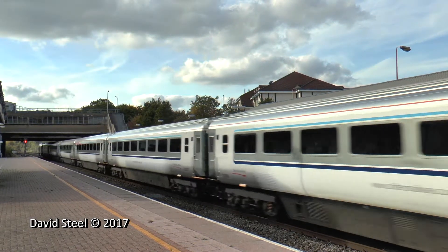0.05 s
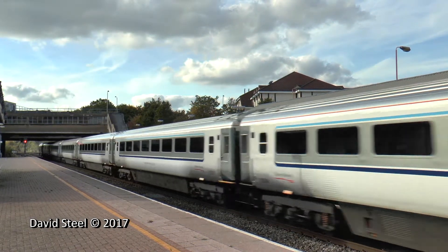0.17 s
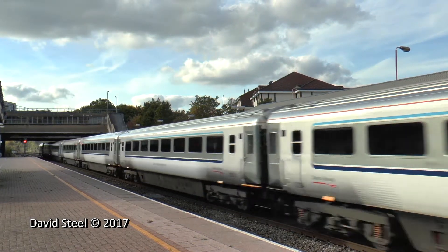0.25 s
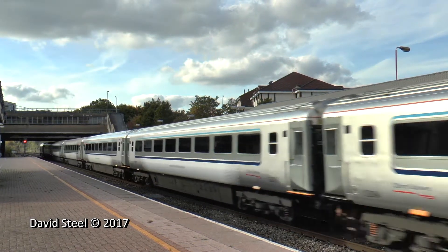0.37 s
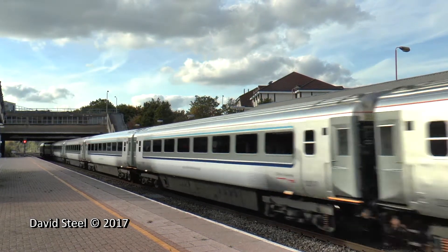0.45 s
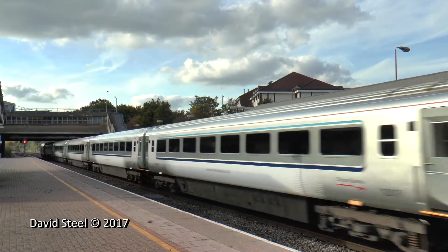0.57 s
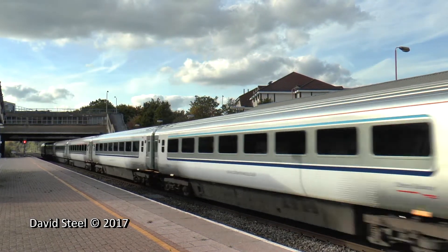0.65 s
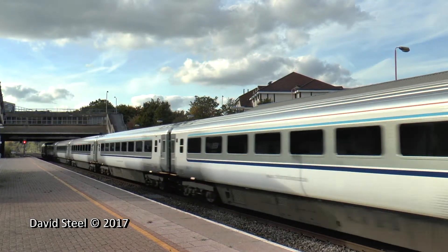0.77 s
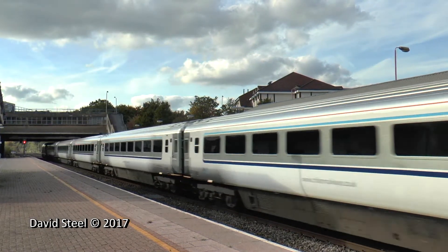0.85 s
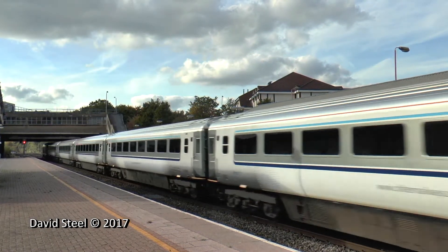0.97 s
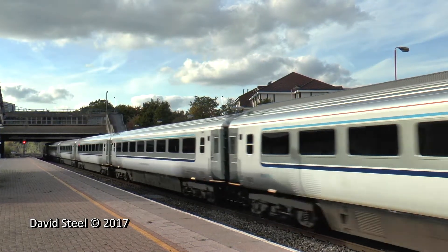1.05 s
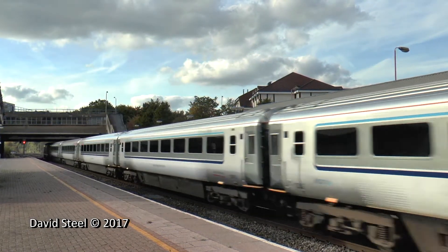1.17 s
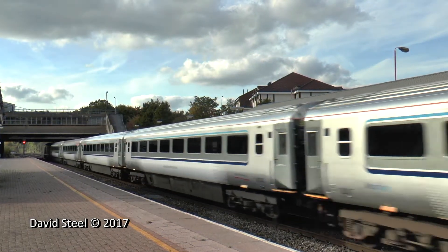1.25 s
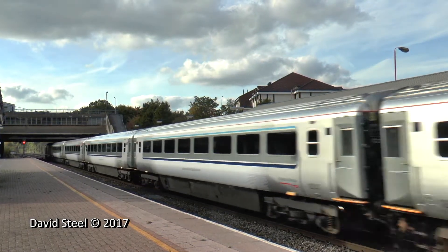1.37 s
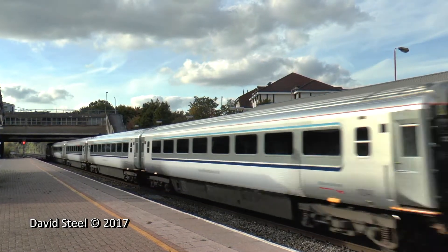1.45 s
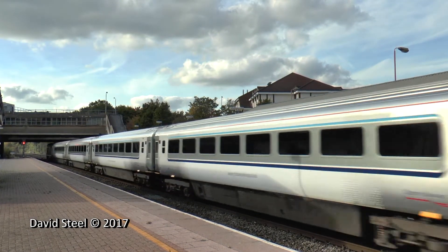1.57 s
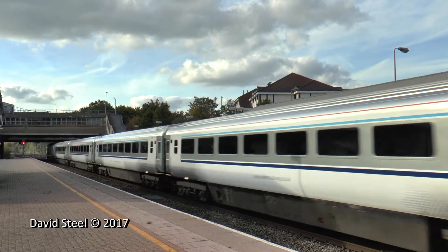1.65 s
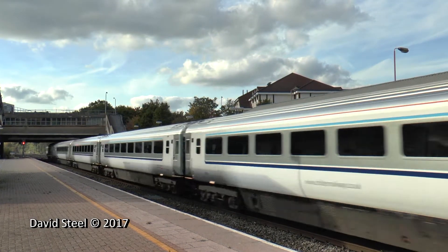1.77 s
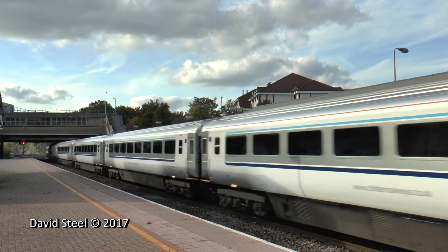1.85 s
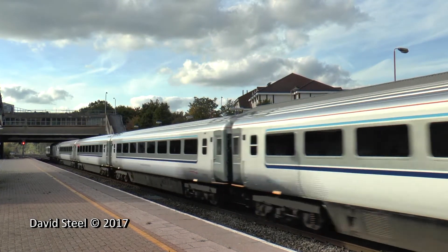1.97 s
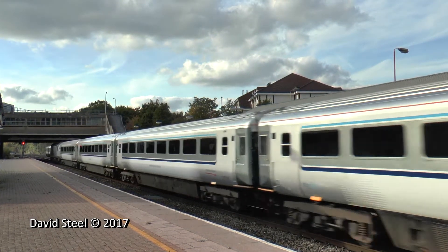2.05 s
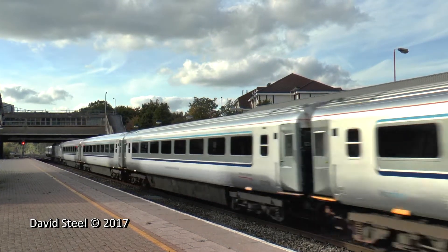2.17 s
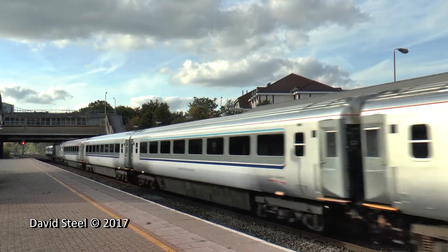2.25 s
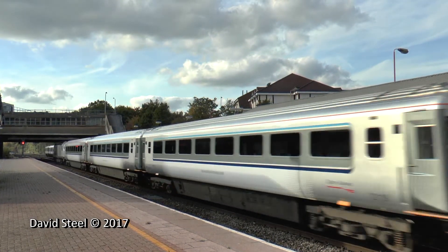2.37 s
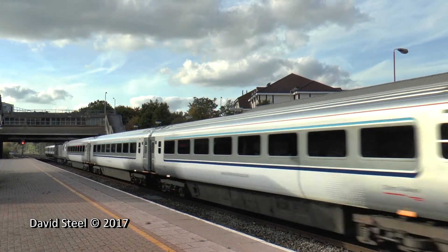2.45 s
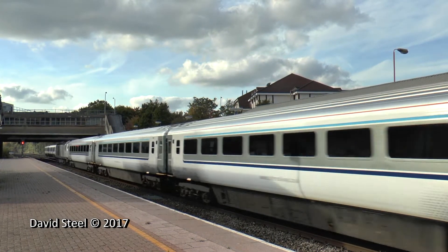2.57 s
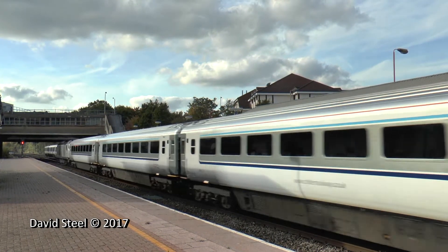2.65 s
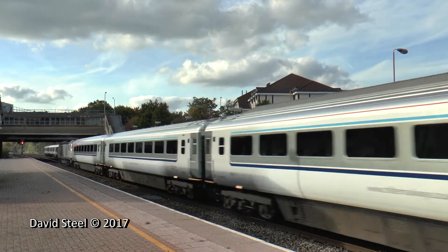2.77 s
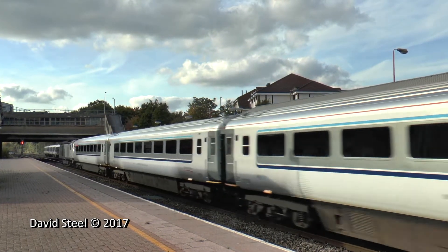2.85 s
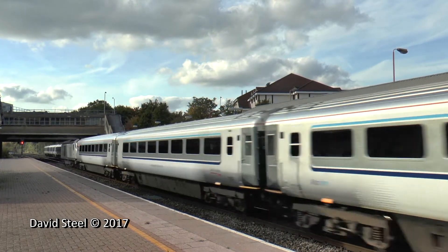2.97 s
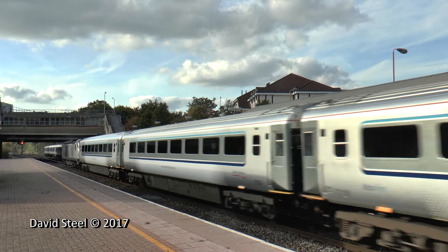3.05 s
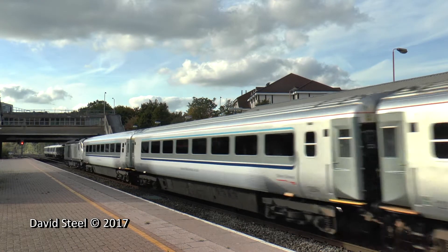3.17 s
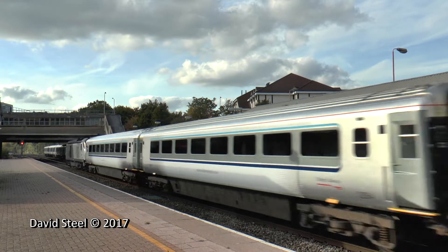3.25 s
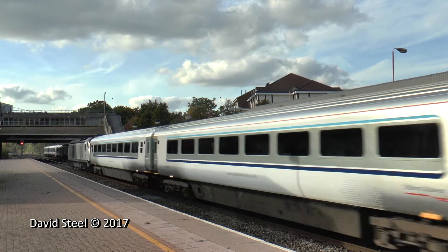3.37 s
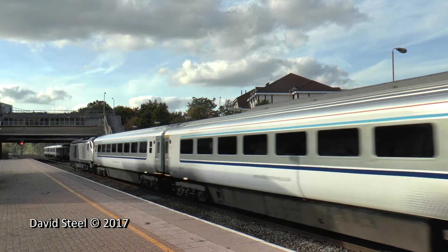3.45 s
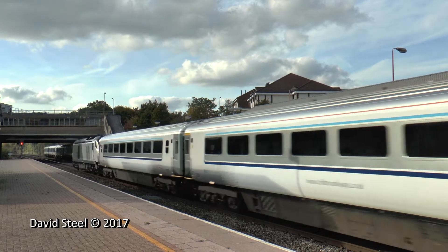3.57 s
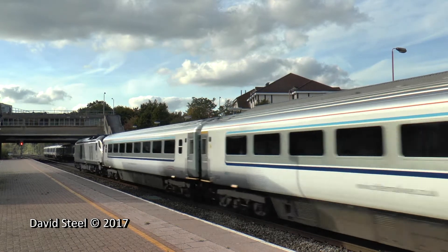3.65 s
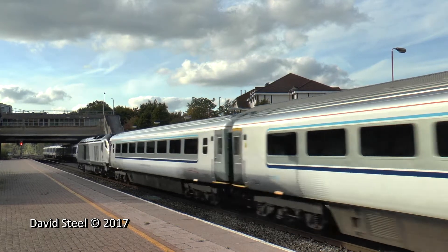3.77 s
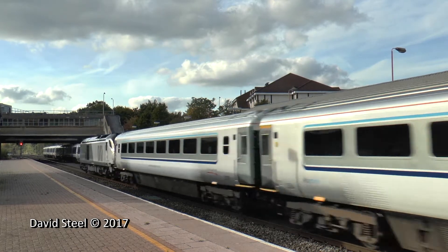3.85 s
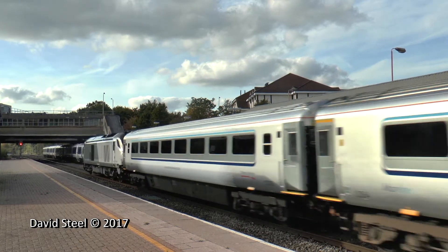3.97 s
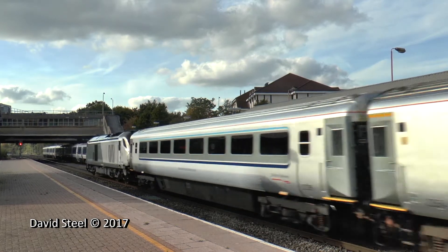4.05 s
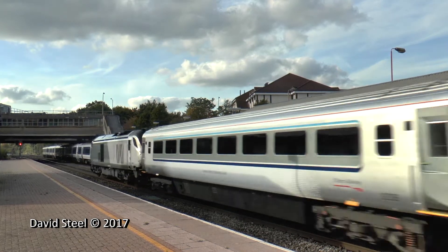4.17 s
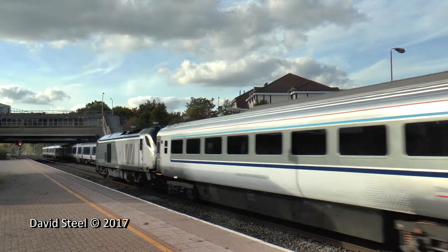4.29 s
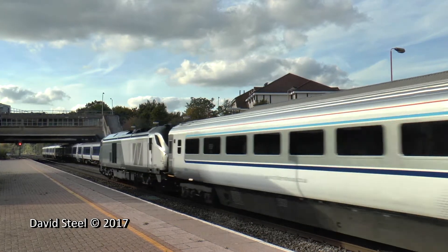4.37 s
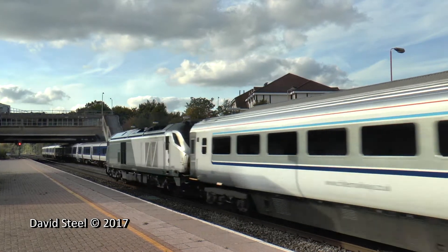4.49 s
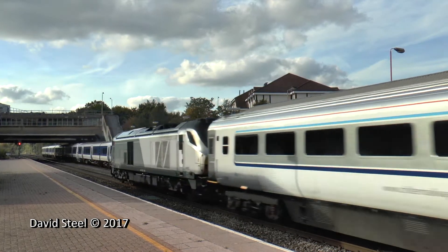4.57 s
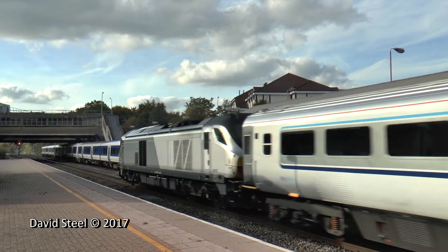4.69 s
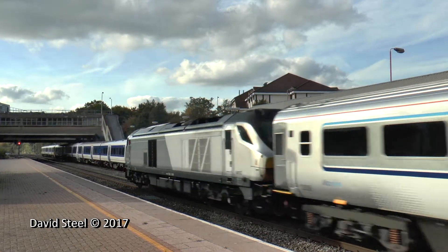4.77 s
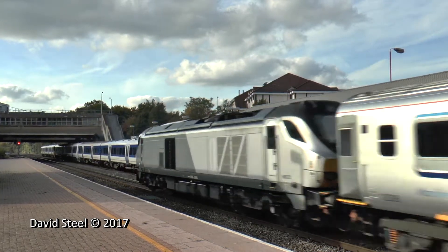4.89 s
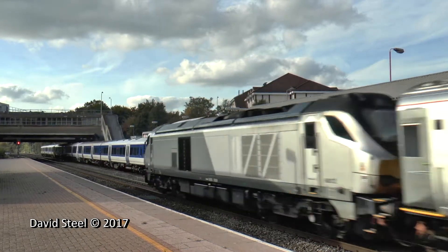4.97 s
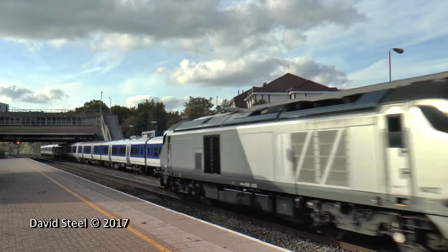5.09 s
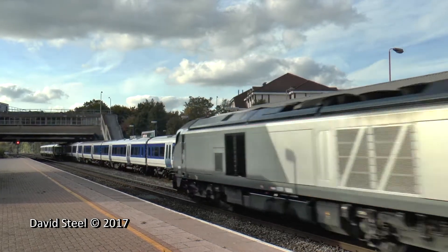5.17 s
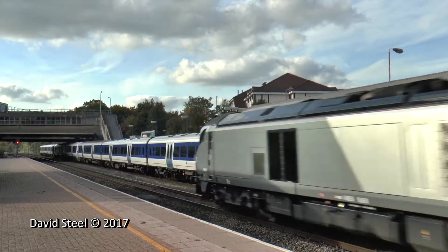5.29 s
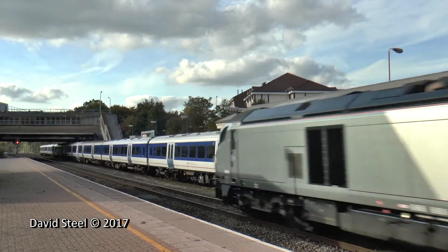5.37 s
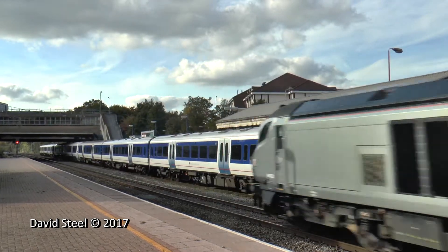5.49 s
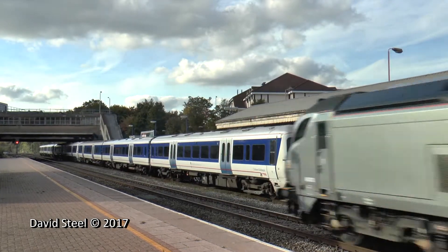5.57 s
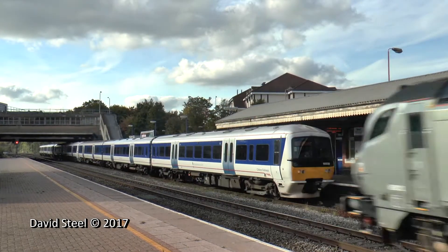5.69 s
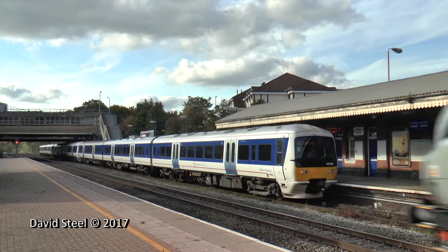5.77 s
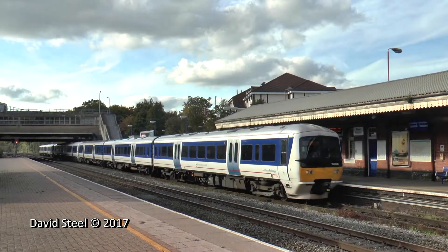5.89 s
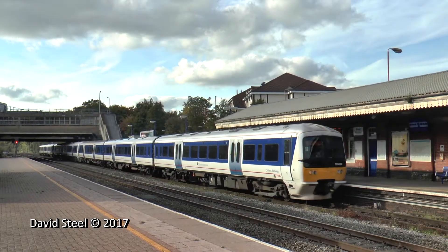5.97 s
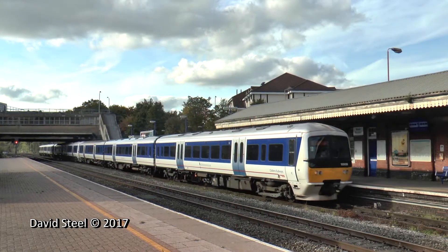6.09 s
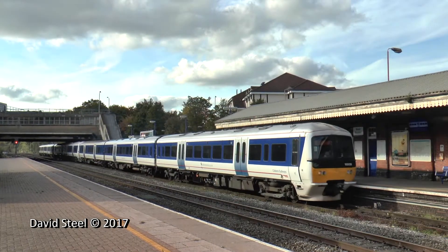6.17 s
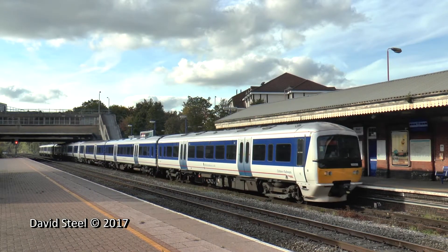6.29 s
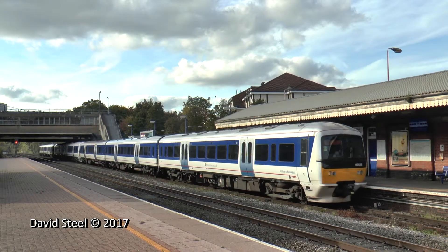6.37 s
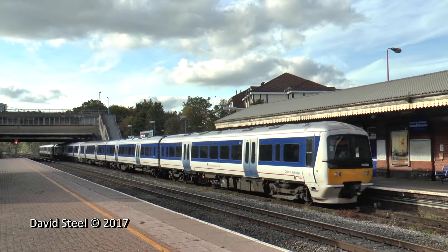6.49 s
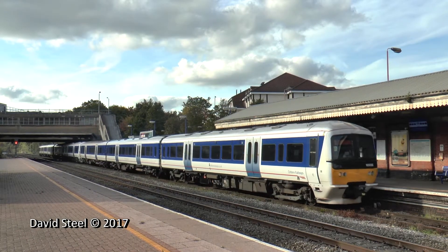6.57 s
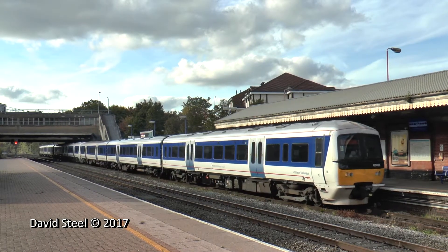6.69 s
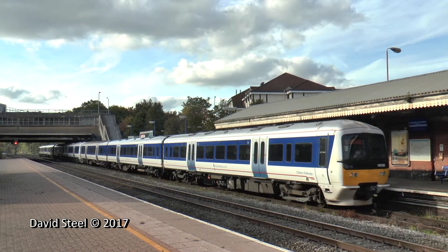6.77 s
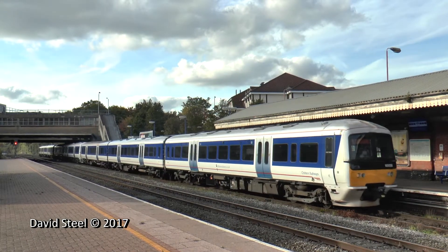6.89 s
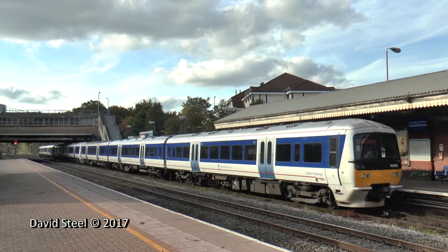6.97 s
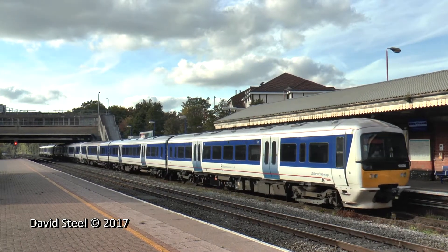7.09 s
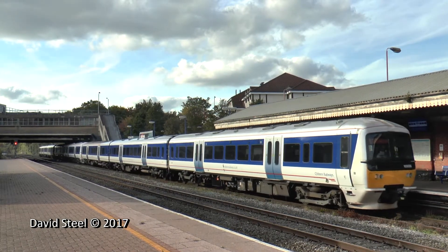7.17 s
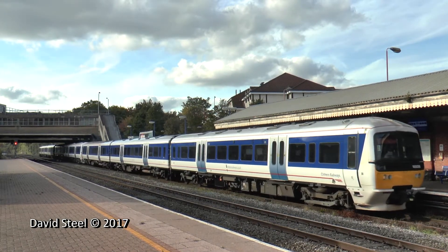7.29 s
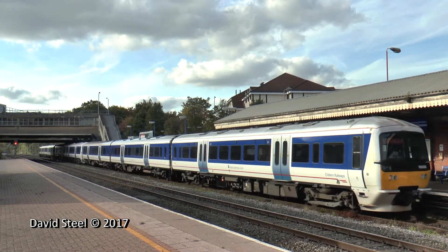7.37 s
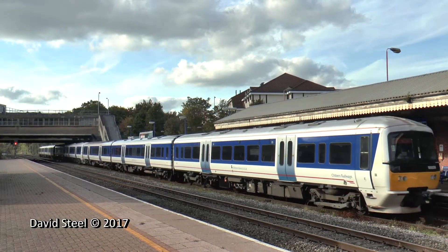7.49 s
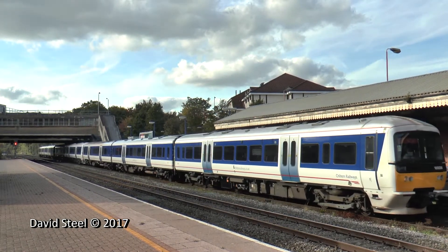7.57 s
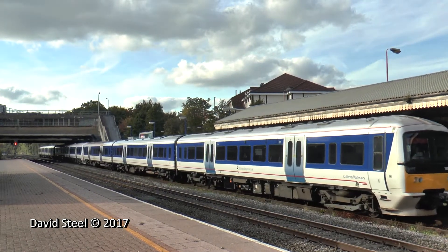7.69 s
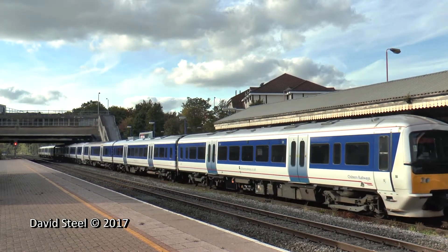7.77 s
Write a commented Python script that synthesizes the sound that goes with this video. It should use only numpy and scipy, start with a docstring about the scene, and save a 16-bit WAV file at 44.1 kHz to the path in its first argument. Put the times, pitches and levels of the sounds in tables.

```python
"""A line of coaches rushes past a platform with roaring rails, hissing and singing wheels, and a knocking flat spot.
A diesel locomotive pushes from the rear: its drone drops in pitch as it passes, and the station ahead returns it higher.
The drone is a stack of sines on multiples of the engine cycle, with a noisy puff of turbulence under it.
Roar, hiss and clatter are coloured noise, knocks are short bursts of noise, and wheel rings are narrow bands of noise.
Gear hum mixes narrow noise with a sine, and the turbocharger is a high, wide band of noise."""
import sys
import numpy as np
from scipy import signal
from scipy.fft import rfft, irfft, next_fast_len
from scipy.io import wavfile
from scipy.ndimage import uniform_filter1d, map_coordinates

SR = 44100
rng = np.random.default_rng(int(sys.argv[2]) if len(sys.argv) > 2 else 0)


def generate_wav(sig):
    """Save sig (samples, or channels by samples) to the path in sys.argv[1] as 16-bit PCM at SR."""
    pcm = np.round(np.clip(np.atleast_2d(sig).T, -1, 1) * 32767).astype(np.int16)
    wavfile.write(sys.argv[1], SR, pcm)


N = 345303  # length in samples

# Ground rumble and microphone hiss. Each row: frequency in Hz, strength in dB per Hz before levelling.
FLOOR_COLOUR = [(15, -42), (25, -22), (36, -2), (60, -1), (85, -0.5), (300, -45), (9000, -50),
                (15700, -48.5)]
# Rumble of the train's body. Each row: frequency in Hz, strength in dB per Hz before levelling.
RUMBLE_COLOUR = [(40, -72), (70, -13.5), (100, 0.5), (160, 5), (250, 2), (380, -1), (520, -13), (700, -44),
                 (1500, -120)]
# Rails under the coaches. Each row: frequency in Hz, strength in dB per Hz before levelling.
RAIL_COLOUR = [(280, -44), (480, -8.5), (627, -4), (734, 0.5), (811, 0), (940, -2), (1330, -11.5),
               (1500, -12.5), (1950, -47), (3300, -120)]
# Rails under and behind the locomotive. Each row: frequency in Hz, strength in dB per Hz before levelling.
RAIL_BEHIND_COLOUR = [(280, -49), (480, -6), (673, -1.5), (803, -9), (986, -9.5), (1170, -12), (1500, -11),
                      (1950, -22), (3300, -120)]
# Hiss of the coach wheels. Each row: frequency in Hz, strength in dB per Hz before levelling.
WHEEL_COLOUR = [(760, -24), (1300, -21.5), (1460, -3.5), (1580, -9), (1720, 0), (2120, -1.5), (2660, -6.5),
                (3340, -7.5), (3790, -6.5), (5450, -11.5), (6240, -9), (6710, -12), (7920, -20.5),
                (11400, -27), (15600, -42)]
# Engine clatter. Each row: frequency in Hz, strength in dB per Hz before levelling.
ENGINE_COLOUR = [(760, -46), (1300, -23), (1460, -6), (1620, -6), (2140, 0.5), (2370, -1.5), (2860, -2),
                 (3560, -4.5), (3830, -9), (4960, -11), (7140, -21.5), (9350, -32), (9950, -28),
                 (11400, -41), (15600, -60)]
# Exhaust turbulence. Each row: frequency in Hz, strength in dB per Hz before levelling.
PUFF_COLOUR = [(30, -120), (60, -38), (95, 11), (140, 13), (190, 9.5), (260, 0.5), (400, -52), (900, -120)]

# Body and rails over time. Each row: time in seconds, rumble in dB, rail roar in dB, both before a fixed trim.
BODY_LEVELS = [(0, -40.5, -26), (.06, -39.5, -38.5), (.65, -41.5, -35), (1.15, -40, -36.5),
               (2.3, -38, -34.5), (2.6, -36.5, -31.5), (3.6, -33, -31.5), (4.05, -41.5, -35),
               (4.9, -38, -36.5), (5.15, -40.5, -36.5), (5.42, -33, -33.5), (5.65, -35, -35),
               (5.9, -32.5, -34.5), (6.3, -38.5, -37.5), (7.2, -41.5, -41), (7.83, -40, -38)]
# Wheel and engine roar over time. Each row: time in seconds, level in dB, extra brightness in dB above 4.5 kHz.
TREBLE_LEVELS = [(0, -35, 0.5), (.1, -37.5, 1.5), (.55, -37, 0), (1.4, -38, 1), (2.2, -37, 0.5),
                 (2.5, -35.5, -1.5), (3.65, -36, 0), (4.1, -37.5, -3), (4.75, -37.5, -1.5),
                 (4.9, -40, -1.5), (5.0, -38, -1.5), (5.45, -32, 3), (5.55, -34.5, 0), (5.68, -31, 2),
                 (6.1, -31.5, 1.5), (6.45, -36, -0.5), (6.9, -35.5, 0), (7.08, -40, 1), (7.83, -39.5, 0.5)]
# Blows of the flat spot. Each row: start in seconds, peak in dB before a fixed trim,
# wheel ring in dB relative to that peak.
FLAT_KNOCKS = [(0.109, -12, -5), (0.216, -16, -12), (0.340, -17, -16), (0.395, -19, -17),
               (0.457, -13.5, -17), (0.555, -12.5, -12), (0.643, -15.5, -5), (0.765, -16, -12),
               (1.837, -24, -13), (2.035, -19, -17), (2.461, -15, -11), (2.639, -10.5, -17),
               (2.765, -9, -8), (2.872, -16, -14), (2.955, -17, -11), (3.128, -11.5, -21), (3.22, -19, -12),
               (3.327, -16, -5), (3.442, -8, -9), (3.544, -6, -9), (3.632, -9, -15), (3.745, -8.5, -2.5),
               (3.859, -11, -8), (3.968, -11, -4), (4.19, -15.5, -13), (4.296, -19, -11), (4.405, -15, -7),
               (4.766, -25, -13), (5.037, -19, -15), (5.132, -29, -13)]
# What a blow sets going: rail, wheel, wheel rattle.
# Each row: centre in Hz, width in Hz, time to fade by 60 dB in seconds.
KNOCK_PARTS = [(800, 314, 0.11), (2130, 360, 0.087), (4200, 2100, 0.064)]
# Ringing coach wheels. Each row: time of passing in seconds, pitch in Hz before the slide,
# ring level in dB, upper ring level in dB.
WHEEL_RINGS = [(-.05, 2130, -48, -38.5), (.85, 2050, -45.5, -57), (1.849, 2150, -43, -49),
               (2.75, 2150, -41, -70), (3.65, 2110, -39.5, -50), (4.45, 2010, -43.5, -72)]
# Gear hum of the front and rear bogies (wheel frames).
# Each row: time when loudest in seconds, level in dB before mixing, power of distance.
GEAR_HUMS = [(5.38, -37, 1.1), (5.9, -36.5, 2.1)]
# When the front and rear bogies of the locomotive pass. Each entry: time in seconds.
BOGIE_PASSES = [5.47, 6.1]
# Turbocharger hiss over time. Each row: time in seconds, level in dB.
TURBO_LEVELS = [(3.8, -71), (4.3, -63), (4.9, -60.5), (5.25, -53), (5.45, -46), (5.76, -44.5), (6.16, -61),
                (6.65, -59), (7.83, -68)]

# Exhaust drone over time. Each row: time in seconds, level of the strongest orders in dB,
# orders below them in dB relative to that, orders above them in dB relative to that.
DRONE_LEVELS = [(0.1, -62, 11.5, 7), (0.6, -49.5, 4, 1), (0.95, -42.5, 0, 13), (1.4, -36.5, 3, 0),
                (1.9, -31.5, 4.5, 7), (2.4, -24.5, -3, 1), (3.0, -21, 1, -5.5), (3.5, -29.5, 6, 3),
                (4.05, -21, -4, 2), (4.8, -19.5, -1, -0.5), (5.4, -21.5, 2, 3), (5.7, -19, 2, -9.5),
                (6.1, -25, 5.5, 1.5), (6.4, -21, -3, -2.5), (6.85, -23.5, -4, 0.5), (7.15, -18.5, -7, -6.5),
                (7.4, -24.5, -4, -4), (7.6, -37, 5, 7.5), (7.8, -32.5, 7, 0)]
# Level of the highest orders over time. Each row: time in seconds, level in dB.
TOP_ORDER_LEVELS = [(0, -56), (2.0, -47.5), (2.6, -40.5), (3.5, -31), (5.3, -31.5), (5.7, -36),
                    (6.5, -32.5), (7.0, -41), (7.5, -33.5), (7.83, -40)]
# Multiples of the engine cycle. Each row: one family, from low through strongest and upper to highest.
ORDER_FAMILIES = [
    [5, 6, 7, 8],
    [9, 10],
    [11, 12, 13, 14],
    [15, 16, 17, 18],
]
# Balance inside each family. Each row: one level in dB for each order of that family.
FAMILY_BALANCE = [
    [-26.5, -32, -12.5, -3.5],
    [1, -16.5],
    [-3.5, -8, -10.5, -23.5],
    [0.5, -10, -4, -14],
]
# Drone returned by the station. Each row: time in seconds, level in dB.
ECHO_LEVELS = [(0, -70), (6.0, -58), (6.4, -36), (6.7, -23), (6.95, -23.5), (7.2, -25), (7.4, -23),
               (7.55, -48), (7.83, -46)]
# Multiples of the engine cycle in the echo. Each entry: an order number.
ECHO_NUMBERS = [9, 10, 11, 12, 13]
# Balance of the echo. Each entry: level in dB of the matching order.
ECHO_BALANCE = [-3.5, -21, -4.5, -14, -22]

# Stereo width: share of the lean at each frequency. Each row: frequency in Hz, plain factor.
LEAN_SHARE = [(100, 0.019), (250, 0.13), (500, 0.79), (1000, 1.28), (2500, 1.2), (4500, 0.62), (5600, .05),
              (7200, .05), (8000, 2.1), (15000, 0.85)]
# Level of the unrelated left-right part; nearly mono at 5.6-7.2 kHz. Each row: frequency in Hz, level in dB.
UNRELATED_SIDE = [(25, -3), (45, -13), (70, -14), (140, -31), (250, -17.5), (500, -9), (1000, -9),
                  (2500, -8), (4500, -7.5), (5600, -18), (7200, -52), (8000, -7), (9500, 0), (15000, -7)]
# Full phase lead of the left port, negative where the right leads. Each row: frequency in Hz, lead in radians.
PORT_LEAD = [(60, -0.5), (150, -.4), (700, -0.75), (1250, -0.9), (1950, .6), (3100, -0.0019), (4300, 0.74),
             (5700, .1), (7500, -.1), (9200, 1.8), (15000, 0)]
# Lean to the left over time. Each row: time in seconds, left over right in dB before the share of the lean.
SIDE_LEAN = [(0, -7), (1.2, -6), (2.5, -4.5), (3.7, -6.5), (5.1, -0.5), (5.8, -8), (6.28, -9.5),
             (7.2, -4.5), (7.83, -3.5)]

SPEED, TRACK, SOUND_SPEED = 25.5, 7, 343  # train speed in m/s, distance to the track in m, sound in m/s
CYCLE_HZ, PASS_S = 14.36, 5.72  # engine cycles a second, time the engine passes
FLOOR_DB = -46
COACH_S, COUPLING_S = 0.942, 0.02  # seconds from coupling to coupling, time of the first
SWELL_DB, SWELL_TOP_DB, SWELL_RAIL_DB = 0.3, 1.3, 0  # swing at the bogies: hiss, its top, rail
FLICKER_DB, FLICKER_TOP_DB = 0.03, 0.3  # random flutter of the hiss and of its top
CLATTER, CLATTER_S, CLATTER_FALL = 0.42, 5.95, 0.5  # typical depth 0-1, time when deepest, power of distance
STROKE_S = 6.635  # time of one of the louder strokes
RATTLE_DB, KNOCK_RISE_S = -6, 0.0066  # rattle relative to the wheel ring, rise time of a blow
SING_SLIDE, SING_FALL = 0.6, 2.2  # share of the full pitch slide (as a power), power of distance
UPPER_RING_HZ = 3495
ABREAST_S, TURN_S, AHEAD = 5.75, 0.13, 0.23  # phase lead grows: time, seconds of the turn, share before it
TOP_HZ = 15710  # band limit

TIME = np.arange(N) / SR  # seconds


def amp(db):
    """Turn dB into a plain loudness factor."""
    return 10 ** (np.asarray(db) / 20)


def unit(x):
    """Scale a signal to an average (rms) size of 1."""
    return x / np.sqrt(np.mean(np.abs(x) ** 2) + 1e-20)


def along(points, hz):
    """Read a curve of frequency rows, spacing the frequencies as the ear does (logarithmically)."""
    f, v = np.transpose(points)
    return np.interp(np.log(hz + 1), np.log(f + 1), v)


def curves(rows):
    """Draw one line over time, straight between the rows, for each column after the time."""
    s, *cols = np.transpose(rows)
    return [np.interp(TIME, s, c) for c in cols]


def wobble(rate):
    """A smooth random curve with the given number of knots a second."""
    coarse = np.arange(0, N + 64, 64)
    knots = rng.standard_normal(int(N * rate / SR) + 4)
    return np.interp(np.arange(N), coarse, map_coordinates(knots, [coarse * rate / SR]))


def filtered(x, response):
    """Shape a sound by a response that depends on frequency."""
    m = next_fast_len(N + SR // 2)
    return irfft(rfft(x, m) * response(np.fft.rfftfreq(m, 1 / SR)), m)[..., :N]


def rush(spectra, patchy_db):
    """Two unrelated noises with shared patches of random gain, at rms 1 in each of the given colours."""
    grains = signal.stft(rng.standard_normal((2, N)), nperseg=512)[2]
    field = rng.standard_normal(grains.shape[1:])
    field = uniform_filter1d(uniform_filter1d(field, 6, 0), 10, 1)
    pair = signal.istft(grains * amp(patchy_db * unit(field)), nperseg=512)[1][:, :N]
    return [unit(x) for x in filtered(pair, lambda hz: amp([[along(s, hz)] for s in spectra]))]


def narrow(hz, width_hz):
    """Two narrow noises of rms 1: slow noise carried on a tone that may move in pitch."""
    carrier = 2 * np.pi * np.cumsum(hz) / SR
    slow = filtered(rng.standard_normal((4, N)), lambda f: 1 / (1 + (2 * f / width_hz) ** 4))
    return unit(slow[:2] * np.cos(carrier) + slow[2:] * np.sin(carrier))


def nearness(pass_s, fall):
    """1 beside the microphone, falling with a power of distance."""
    return (TRACK / np.hypot(SPEED * (TIME - pass_s), TRACK)) ** fall


def doppler(pass_s):
    """Pitch factor of a moving part: high while it nears, low once it has passed."""
    way = SPEED * (TIME - pass_s)
    return 1 / (1 + SPEED / SOUND_SPEED * way / np.hypot(way, TRACK))


def background():
    """Steady ground rumble and microphone hiss, as coloured noise."""
    return amp(FLOOR_DB) * rush([FLOOR_COLOUR], patchy_db=1.0)[0]


def louder_strokes(cycles):
    """One engine stroke is louder in each cycle, most clearly when the engine is beside the microphone."""
    depth = CLATTER * nearness(CLATTER_S, CLATTER_FALL) * amp(1.06 * wobble(2.7))
    turns = cycles - cycles[round(STROKE_S * SR)]
    return unit(1 + np.clip(depth, 0, 1) * np.cos(2 * np.pi * turns))


def roar(cycles):
    """Body rumble, rail roar, and a treble that turns from wheel hiss to engine clatter as the engine arrives."""
    rumble_db, rail_db = curves(BODY_LEVELS)
    hiss_db, bright_db = curves(TREBLE_LEVELS)
    shake = wobble(15)  # shared by rail and hiss
    near = 1 / (1 + np.exp((5.0 - TIME) / 0.95))  # 0 for coaches, 1 for the locomotive
    bogies = (1 - near) * np.cos(2 * np.pi * (TIME - COUPLING_S) / COACH_S)

    def blend(coaches, locomotive):
        return unit((1 - near) * coaches + near * locomotive)

    rumble = amp(rumble_db + 6.5) * rush([RUMBLE_COLOUR], patchy_db=0.1)[0]

    rail_noise = blend(*rush([RAIL_COLOUR, RAIL_BEHIND_COLOUR], patchy_db=0.98))
    rail = amp(rail_db - 1.27 + SWELL_RAIL_DB * bogies + 0.59 * shake) * rail_noise

    wheels, engine = rush([WHEEL_COLOUR, ENGINE_COLOUR], patchy_db=1.25)
    treble = blend(wheels, louder_strokes(cycles) * engine)
    # The top above 4.5 kHz follows its own brightness curve.
    top = filtered(treble, lambda hz: 1 / (1 + (4500 / (hz + 1)) ** 6))
    top_db = bright_db + SWELL_TOP_DB * bogies + FLICKER_TOP_DB * wobble(9)
    treble = treble + (amp(top_db) - 1) * top
    hiss = amp(hiss_db + SWELL_DB * bogies + 0.46 * shake + FLICKER_DB * wobble(12)) * treble
    return rumble + rail + hiss


def knocks():
    """Each blow of the flat spot sets rail and wheel rattling briefly, as fading bursts of noise."""
    out = np.zeros((2, N + SR))
    t = np.arange(SR // 8) / SR
    rise = 1 - np.exp(-t / KNOCK_RISE_S)
    for start_s, db, ring_db in FLAT_KNOCKS:
        levels = (db, db + ring_db, db + ring_db + RATTLE_DB)
        for (hz, width_hz, t60), level in zip(KNOCK_PARTS, levels):
            band = signal.butter(2, [hz - width_hz / 2, hz + width_hz / 2], "bandpass", fs=SR)
            burst = unit(signal.lfilter(*band, rng.standard_normal((2, len(t)))))
            fade = amp(level - 10.5 - 60 * t / t60)
            out[:, round(start_s * SR):][:, :len(t)] += fade * rise * burst
    return out[:, :N]


def singing_wheels():
    """Coach wheels ring in two narrow bands; the loudest wheel mostly sets the pitch of the lower one."""
    power = np.array([(amp(db) * nearness(s, SING_FALL)) ** 2 for s, _, db, _ in WHEEL_RINGS])
    pitches = [hz * doppler(s) ** SING_SLIDE for s, hz, _, _ in WHEEL_RINGS]
    ring_hz = sum(p * hz for p, hz in zip(power, pitches)) / power.sum(0)
    ring = np.sqrt(power.sum(0)) * narrow(ring_hz, 130)
    upper_level = sum(amp(upper_db) * nearness(s, SING_FALL) for s, _, _, upper_db in WHEEL_RINGS)
    return ring + upper_level * narrow(np.full(N, UPPER_RING_HZ), 1100)


def gear_hum():
    """Meshing gears hum in each locomotive bogie, as noise and a sine that slide down with its pass."""
    out = np.zeros((2, N))
    for (loudest_s, db, fall), pass_s in zip(GEAR_HUMS, BOGIE_PASSES):
        hz = 728 * doppler(pass_s)
        tone = np.sin(2 * np.pi * np.cumsum(hz) / SR + 1.1 * wobble(11))
        mesh = amp(1.2 * wobble(9.8)) * (0.85 * narrow(hz, 40) + 0.83 * tone)
        out += amp(db) * nearness(loudest_s, fall) * mesh
    return out


def turbocharger():
    """A high, wide hiss that slides down with the pass."""
    level = amp(curves(TURBO_LEVELS)[0] + 1.6 * wobble(13))
    return level * narrow(10150 * doppler(PASS_S + 0.04), 1600)


def orders(cycles, numbers, levels_db):
    """Sines on multiples of the cycle; strength wanders alike in both, phase more in the scattered one."""
    def tone(k, drift):
        phase = 2 * np.pi * (k * cycles + rng.random())
        return np.sin(phase + drift * wobble(3) + 1.48 * wobble(0.829))

    out = np.zeros((2, N))
    for k, db in zip(numbers, levels_db):
        direct_and_scattered = np.array([tone(k, 0.39), tone(k, 0.94)])
        out += np.sqrt(2) * amp(db + 1.3 * wobble(5)) * direct_and_scattered
    return out


def exhaust(cycles):
    """The drone with its turbulence, and its return from the station, which the locomotive still nears."""
    main_db, low_db, upper_db = curves(DRONE_LEVELS)
    top_db = curves(TOP_ORDER_LEVELS)[0]
    levels = amp([main_db + low_db, main_db, main_db + upper_db, top_db])
    drone = np.zeros((2, N))
    for level, numbers, balance in zip(levels, ORDER_FAMILIES, FAMILY_BALANCE):
        drone += level * orders(cycles, numbers, balance)
    # The turbulence follows the combined strength of the four families.
    puffs = amp(-17) * np.linalg.norm(levels, axis=0) * rush([PUFF_COLOUR], patchy_db=1.2)[0]
    nearing = TIME * CYCLE_HZ / (1 - SPEED / SOUND_SPEED)
    echo = amp(curves(ECHO_LEVELS)[0]) * orders(nearing, ECHO_NUMBERS, ECHO_BALANCE)
    return drone + puffs + echo


def ports(pair, left_db):
    """Both ports hear the direct sound, differing in level and phase, and opposite shares of the scattered sound."""
    def ways(hz):
        return np.array([along(LEAN_SHARE, hz), 1j * np.tan(along(PORT_LEAD, hz) / 2),
                         amp(along(UNRELATED_SIDE, hz))])

    direct, scatter = pair
    leaning, phased, scattered = filtered(np.array([direct, direct, scatter]), ways)
    # The phase lead between the ports grows as the engine comes abreast.
    abreast = AHEAD + (1 - AHEAD) / (1 + np.exp((ABREAST_S - TIME) / TURN_S))
    lean = (amp(left_db) - 1) / (amp(left_db) + 1)
    side = lean * leaning + abreast * phased + scattered
    return np.array([direct + side, direct - side])


def scene():
    """Add the background, coaches and locomotive, then hear them through the two ports."""
    cycles = np.cumsum(CYCLE_HZ * doppler(PASS_S)) / SR  # engine cycles heard so far
    coaches = knocks() + singing_wheels()
    locomotive = gear_hum() + turbocharger() + exhaust(cycles)
    return ports(background() + roar(cycles) + coaches + locomotive, curves(SIDE_LEAN)[0])


def record(dry):
    """Keep nothing above the band limit."""
    return filtered(dry, lambda hz: hz < TOP_HZ)


dry = scene()
out = record(dry)
generate_wav(out)
```